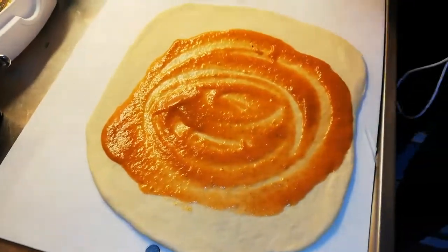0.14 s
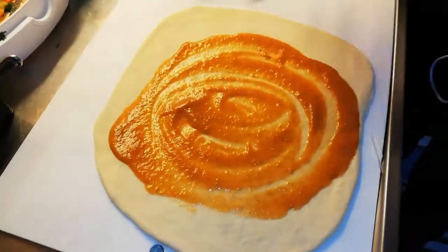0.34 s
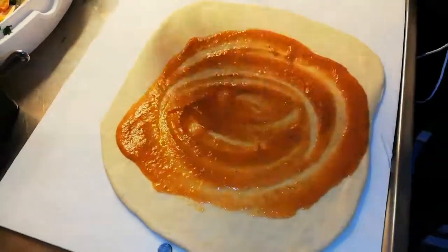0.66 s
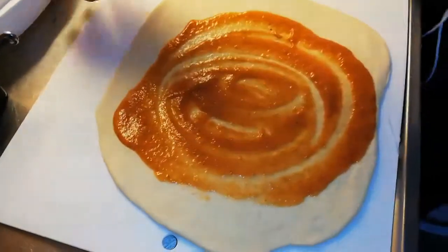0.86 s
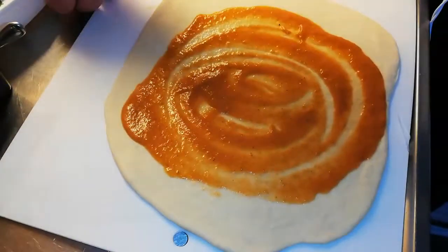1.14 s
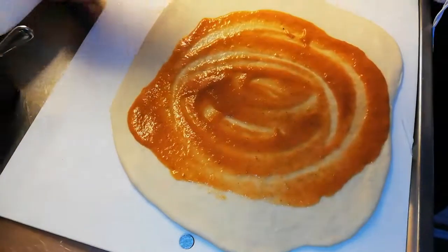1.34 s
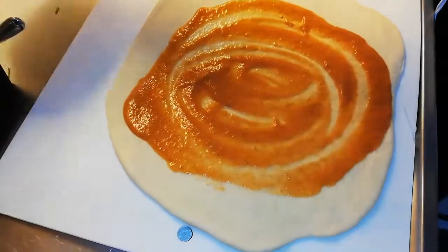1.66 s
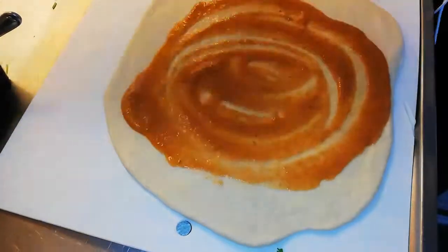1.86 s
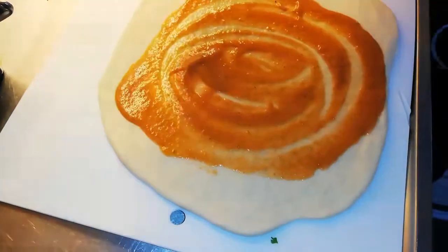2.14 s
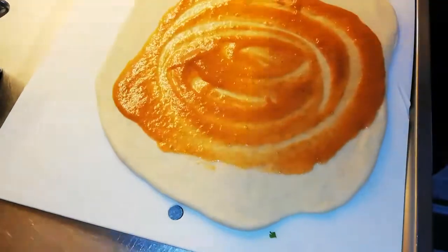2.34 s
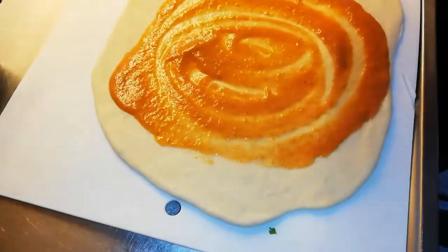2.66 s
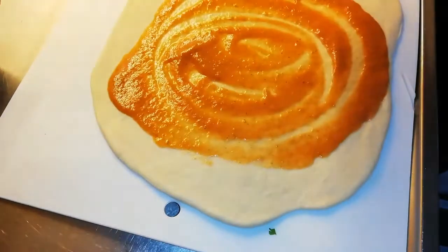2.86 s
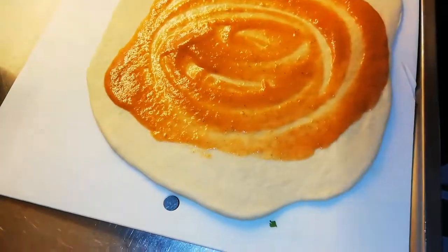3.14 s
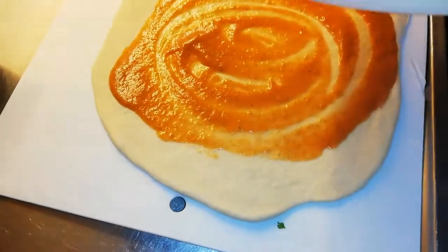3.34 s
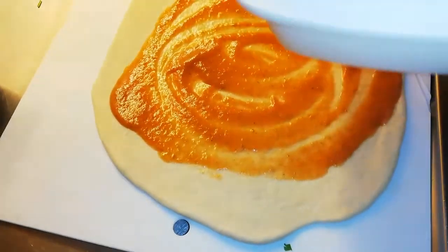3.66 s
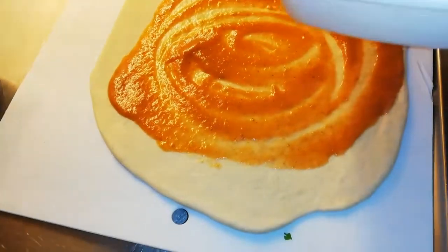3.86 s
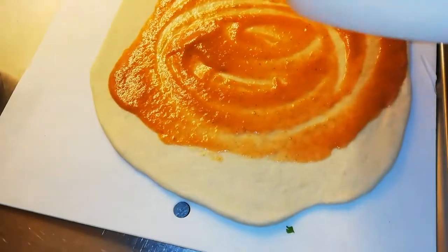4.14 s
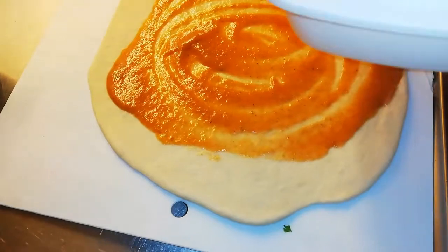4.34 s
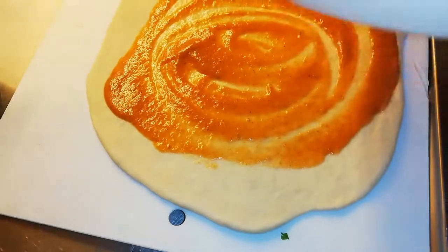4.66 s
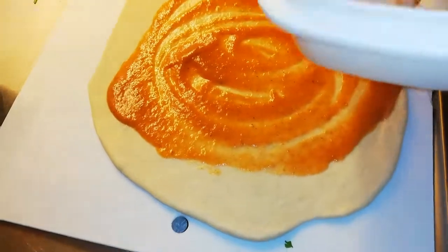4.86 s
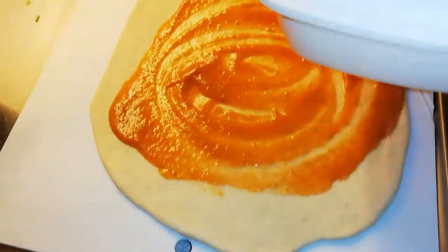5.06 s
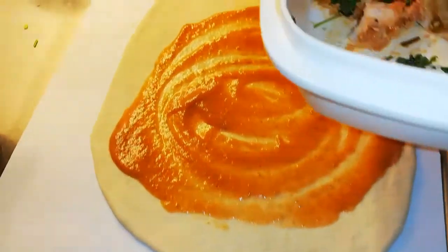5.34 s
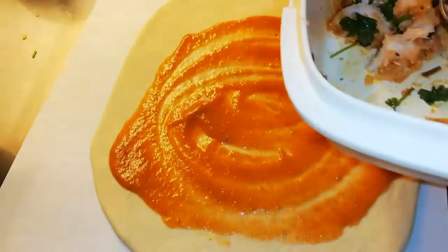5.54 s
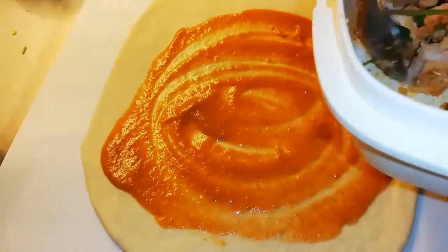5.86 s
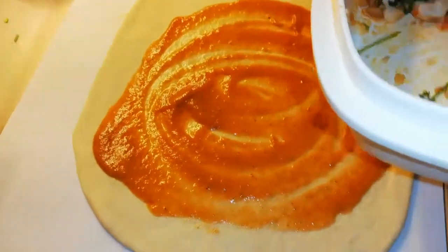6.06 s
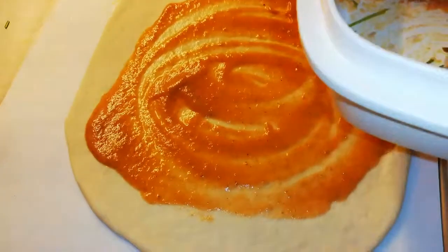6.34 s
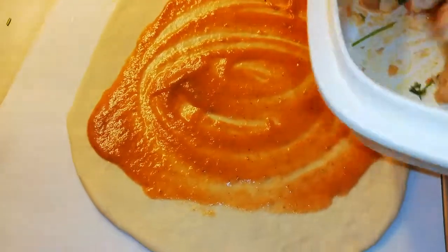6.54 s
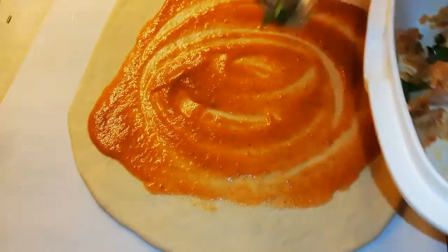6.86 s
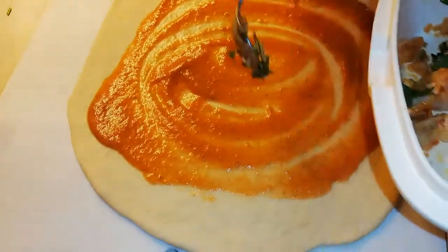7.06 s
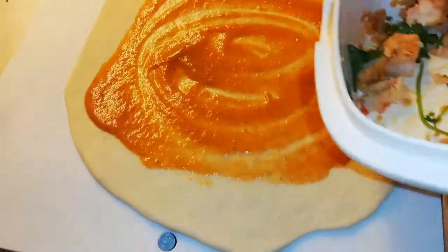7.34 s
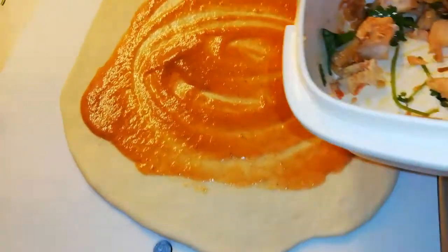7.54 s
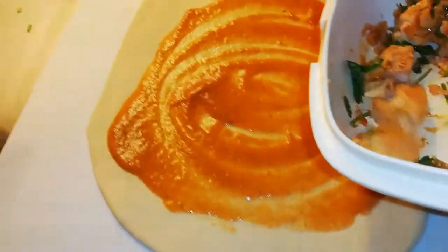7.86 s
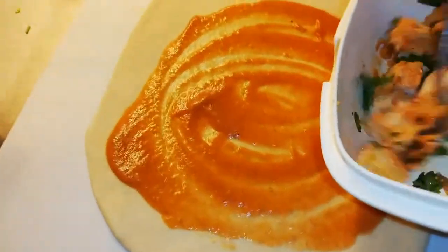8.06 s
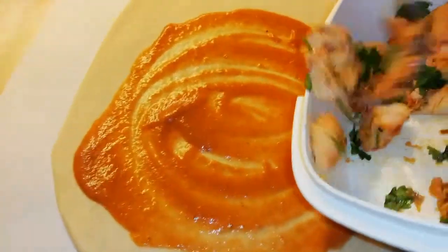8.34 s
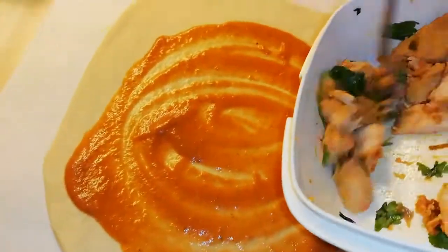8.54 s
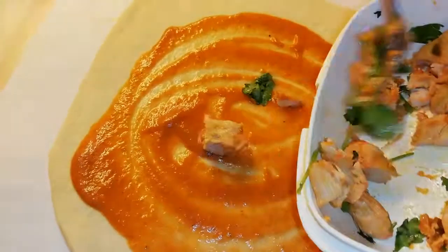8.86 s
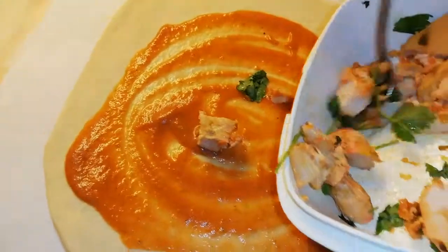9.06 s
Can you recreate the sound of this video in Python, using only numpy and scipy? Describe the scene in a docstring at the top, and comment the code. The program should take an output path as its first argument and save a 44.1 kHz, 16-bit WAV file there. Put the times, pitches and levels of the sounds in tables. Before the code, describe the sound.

A metal spoon works in a plastic food tub, heard close in a slightly echoing home kitchen. After quiet brushing and a few thumps with loose clatter, loud knocks come with quick bounces and short scrapes. Pauses follow, then clustered taps and strokes inside the hollow tub. Tiny wet snaps and faint soft landings close it, over steady appliance rumble and hiss.

```python
"""A small kitchen, close up in stereo: a spoon knocks, bounces and scrapes in a plastic food tub.
A dying clink and soft rubs come first, then dull thuds as things are set down on the counter.
Blows are sums of dying modes with bursts of contact noise; scrapes drive wall resonators with random slips.
Moist food ticks as short treble bursts and plops as soft low pushes.
An appliance rumbles over faint hiss, both made of coloured noise; sparse echoes give the room.
"""
import sys
import numpy as np
from scipy import signal
from scipy.fft import rfft, irfft, next_fast_len
from scipy.io import wavfile
from scipy.ndimage import uniform_filter1d

SR = 44100
rng = np.random.default_rng(int(sys.argv[2]) if len(sys.argv) > 2 else 0)


def digitize_waveform(pressure):
    """Quantize a signal to 16-bit integers and store it at the path in sys.argv[1].

    Rows of a 2-D input are taken as channels; values are limited to [-1, 1].
    """
    field = np.atleast_2d(pressure).T
    bounded = np.clip(field, -1, 1)
    quanta = np.round(bounded * 32767).astype(np.int16)
    wavfile.write(sys.argv[1], SR, quanta)


N = 405940
LIFTED_S = 3.5  # until then the tub stands on the counter, which muffles its hollow


def amp(db):
    """Turns decibels into a gain."""
    return 10 ** (np.asarray(db) / 20)


def evened(x):
    """Brings a signal to an rms of 1."""
    return x / np.sqrt(np.mean(x ** 2) + 1e-20)


def read(points, hz):
    """Reads a curve between its points, along log frequency."""
    f, value = np.transpose(points)
    return np.interp(np.log(hz + 1), np.log(f + 1), value)


def add(mix, s, sound):
    """Lays a stereo sound into the mix at s seconds."""
    part = mix[:, round(s * SR):][:, :sound.shape[1]]
    part += sound[:, :part.shape[1]]


def coloured(x, points):
    """Filters by a spectrum in dB."""
    hz = np.fft.rfftfreq(x.shape[-1], 1 / SR)
    return irfft(rfft(x) * amp(read(points, hz)), x.shape[-1])


def sides(pan_db):
    """Left and right gains that differ by pan_db."""
    return amp([[pan_db / 2], [-pan_db / 2]])


# how the tub's modes reach the pair: (frequency [Hz], left-right level while standing [dB],
# left-right level once lifted [dB], mean phase lead of the left [rad], its scatter [rad])
REACH = [(408, 1.5, -1.5, 2, 0.68), (750, -4, -10, 0.8, 5.4), (1080, -1.5, -4, 0.91, 0.44),
         (1730, -12, -6, -0.61, 0.56), (2330, 2, -2.5, -2.1, 0.9), (3440, 3.5, 1.5, 1.5, 0.79)]


def reach(hz, s):
    """Balance, phase lead and phase scatter between the microphones for a mode of the tub."""
    at, standing_db, lifted_db, lead, scatter = np.transpose(REACH)
    lean_db = standing_db if s < LIFTED_S else lifted_db
    return [read(np.c_[at, value], hz) for value in (lean_db, lead, scatter)]


CREST_S = .0014  # time to the crest of a blow, before the contact lengthens it


def ring(modes, seconds, near_hz=None, rise=0.0012, scatter_db=2.5, detune=0.035, s=None, far_db=0):
    """Dying modes, peak 1; their phases and, for the tub, levels differ between the microphones."""
    hz, db, t60 = np.transpose(modes)[:, :, None]
    t = np.arange(round(seconds * SR)) / SR
    u, v, w, start = rng.standard_normal((len(modes), 4)).T[:, :, None]
    swell = 1 - np.exp(-t / rise)
    lean_db = 0
    apart = np.minimum(hz / 364.0, 2.1) * w
    start = 1.2 * start
    if near_hz:  # the blow favours the modes of the wall that it strikes; they gather into one sharp crest
        octaves = np.log2(hz / near_hz)
        db = db - np.minimum(45 * octaves ** 2, far_db) - 2.5 * np.maximum(octaves - .6, 0)
        crest = CREST_S + 4 * rise  # a long contact swells more slowly and gathers less
        swell = 1 - np.exp(-(t / crest) ** 3)
        start = .3 * crest / CREST_S * start + np.pi / 2 - 2 * np.pi * hz * crest
    if s:
        lean_db, lead, scatter = reach(hz, s)
        apart = lead + scatter * w
    db = db - 10 * np.log10(1 + (hz * rise) ** 4)  # a long contact cannot drive the quick modes
    size = amp(db + scatter_db * u - 60 * t / t60) * swell
    turn = 2 * np.pi * hz * (1 + detune * v) * t + start
    out = np.array([(size * amp(side * lean_db / 2) * np.sin(turn + side * apart / 2)).sum(0)
                    for side in (1, -1)])
    return out / abs(out).max(1).mean()


def crack(t60, colour, over_s=0.011):
    """A short burst of contact noise, level 1 over its first moments, little shared by the microphones."""
    size = min(next_fast_len(round(1.3 * t60 * SR)), 4096)
    t = np.arange(size) / SR
    noise = rng.standard_normal((3, size))
    burst = coloured(noise[:2] + 0.098 * noise[2], colour) * amp(-60 * t / t60)
    burst = burst * (1 - np.exp(-t / .0006))  # a soft onset
    return burst / np.sqrt(np.mean(burst[:, t < over_s] ** 2))


# spectrum of rumble and hiss: (frequency [Hz], relative level [dB per Hz])
ROOM_TONE = [(15, -32.5), (25, 4.5), (48, -7), (76, -17), (115, -2), (205, -16), (222, -19.5), (282, -17.5),
             (441, -24), (544, -29.5), (1140, -30), (7770, -39.5), (9340, -35), (13500, -43)]
TONE_DB = -53  # rms
# how alike the two microphones hear the room: (frequency [Hz], left-right likeness [-1 to 1])
TONE_SAME = [(60, 0.99), (180, 0.97), (550, -0.22), (1650, -0.13), (4970, -0.18), (15000, 0.29)]
# swell of the treble, scaled down for the room tone and in full for faint ticks: (time [s], level [dB])
TREBLE = [(0, 9), (1.9, 0.5), (2.249, 18.5), (2.449, -2.5), (3.6, 9.5), (4.45, 3.5), (4.601, -7),
          (7.151, -9), (7.6, 7), (8.5, -2.5), (9.2, 11.5)]


def room_tone():
    """Rumble and hiss as noise spectra with drifting patches; the treble swells and sinks."""
    frames = (N // 256 + 5) // 2
    hz = np.fft.rfftfreq(2048, 1 / SR)
    a, b, c, d, patches = rng.standard_normal((frames, len(hz), 5)).T
    patches = evened(uniform_filter1d(uniform_filter1d(patches, 14, 0), 6, 1))
    treble_db = np.interp(np.arange(frames) * 512 / SR, *np.transpose(TREBLE))
    # share of the swell in each band
    lift_db = read([(1500, 0.041), (5000, 0.21), (10000, 0.23)], hz)[:, None] * treble_db
    top_db = read([(12800, 8.5), (14500, -17.5)], hz)[:, None]  # a steep drop at the top
    same = np.clip(read(TONE_SAME, hz), -1, 1)[:, None]
    left, other = a + 1j * b, c + 1j * d
    z = np.array([left, same * left + np.sqrt(1 - same ** 2) * other])
    z *= amp(read(ROOM_TONE, hz)[:, None] + 2.7 * patches + lift_db + top_db)
    return amp(TONE_DB) * evened(signal.istft(z, nperseg=2048, noverlap=1536)[1][:, :N])


# a clink already dying: (frequency [Hz], level [dB], t60 [s])
CLINK = [(2010, -49, 0.33), (2220, -41.5, 0.35), (3570, -44, 0.15)]


def dying_clink():
    """The end of an earlier clink, heard through the room, so each line is a narrow noise."""
    out = np.zeros((2, N))
    t = np.arange(SR // 3) / SR
    for hz, db, t60 in CLINK:
        fuzz = evened(uniform_filter1d(rng.standard_normal((2, len(t))), size=200))
        add(out, 0, amp(db - 60 * t / t60) * fuzz * np.sin(2 * np.pi * hz * t))
    return out


# a hand or cloth brushing a surface, three rubs: (time [s], level [dB])
RUBS = [(.39, -51), (.49, -62), (0.601, -51.5)]
# tint of the rubbing noise: (frequency [Hz], relative level [dB per Hz])
BRUSH_COLOUR = [(410, -37), (700, -8), (3030, 0.5), (5010, -8.5), (9610, -3), (12700, -10), (14000, -41)]
RUB_RISE_DB_PER_S, RUB_FALL_DB_PER_S = 126, 125


def brush():
    """Soft rubbing is coloured noise that rises and falls at each rub."""
    out = np.zeros((2, N))
    t = np.arange(SR) / SR
    level = 0
    for s, db in RUBS:
        level = level + amp(db + np.minimum(RUB_RISE_DB_PER_S * (t - s), RUB_FALL_DB_PER_S * (s - t)))
    add(out, 0, level * evened(coloured(rng.standard_normal((2, len(t))), BRUSH_COLOUR)))
    return out


# things set down on the counter: (time [s], peak level [dB], clatter over that peak level [dB])
THUDS = [(0.778, -10, -21), (0.968, -32.5, -23), (1.051, -21, -27), (1.065, -14, -10), (1.087, -12, -15.5),
         (1.105, -19.5, -30), (1.153, -32.5, -8), (1.24, -27.5, -12), (1.317, -25.5, -14.5),
         (1.364, -29, -46)]
# the counter and what stands on it: (frequency [Hz], relative level [dB], t60 [s])
COUNTER = [(51.8, -21, 0.87), (107, -20.5, 1), (137, -6.5, 0.12), (173, 4.5, 0.072), (228.5, 2.5, 0.1),
           (275.6, -3, 0.11), (360, -1.5, 0.047), (460, -12, 0.4), (520, 0.5, 0.06), (602, -5.5, 0.059)]
# spectrum of loose things clattering: (frequency [Hz], relative level [dB per Hz])
CLATTER = [(350, -26), (600, 6.5), (1400, 3), (1540, 2.5), (2280, -0.5), (10200, -15.5), (15000, -33)]


def thuds():
    """Heavy blows ring the counter, gentle ones only its low modes; loose things on it clatter."""
    out = np.zeros((2, N))
    for s, db, clatter_db in THUDS:
        contact_s = 0.0018 * amp(-0.55 * (db + 13.0))  # gentle blows touch for longer
        add(out, s, amp(db) * ring(COUNTER, 0.48, rise=contact_s, scatter_db=3.0, detune=0.00083))
        add(out, s, amp(db + clatter_db) * sides(0.28) * crack(0.19, CLATTER))
    return out


# spoon on tub: (time [s], peak level of the wall ring [dB], pitch of the struck wall [Hz],
# crack over that peak level [dB])
KNOCKS = [(1.06, -19.5, 523, -5.5), (1.311, -30, 2270, -18), (1.433, -32.5, 1980, -24),
          (2.032, -13, 720, -23.5), (2.453, -4.5, 1360, -16.5), (2.467, -14.5, 1190, -14.5),
          (2.548, -20, 1730, -37.5), (2.558, -24, 1810, -19.5), (2.586, -19.5, 2350, -16.5),
          (2.613, -11.5, 2300, -24), (2.842, -6, 1170, -17), (2.849, -11, 1020, -13), (3.11, -4, 1395, -16),
          (3.125, -10, 1900, -16), (3.328, -18.5, 940, -17), (3.333, -15.5, 2270, -25),
          (3.349, -25, 1796, -16), (3.394, -31, 1870, -31), (3.4, -32, 1940, -16.5),
          (3.829, -35.5, 1010, -38), (4.11, -30.5, 1690, -21.5), (4.175, -38.5, 1370, -36),
          (4.324, -44.5, 1830, -16), (4.641, -24.5, 1087, -54.5), (4.675, -18, 1110, -11),
          (4.745, -25.5, 1780, -12.5), (4.76, -18.5, 3530, -17), (4.767, -12, 1635, -19.5),
          (4.778, -16.5, 1760, -35), (4.786, -30, 1750, -34.5), (4.795, -30, 1280, -28),
          (4.813, -19, 1150, -30), (4.82, -21, 1100, -43), (4.842, -32, 1060, -45),
          (4.861, -24.5, 860, -33), (4.877, -22.5, 1110, -30), (4.892, -25.5, 983, -31),
          (4.905, -25.5, 1014, -29.5), (5.115, -37.5, 885, -32), (5.889, -34, 1783, -27),
          (5.936, -12.5, 1030, -14.5), (5.972, -26.5, 662, -43), (6.01, -14.5, 1290, -25),
          (6.028, -21.5, 1350, -21), (6.049, -30, 1200, -45), (6.057, -24, 980, -39),
          (6.066, -17.5, 1150, -35), (6.074, -18, 765, -18), (6.087, -21.5, 1170, -22.5),
          (6.613, -28.5, 589, -41), (6.661, -43.5, 904, -20), (6.736, -41, 1103, -38),
          (7.411, -31.5, 1786, -14.5), (7.667, -11, 1830, -21), (7.718, -23, 1700, -35),
          (7.736, -17.5, 2110, -9), (7.752, -18.5, 910, -13), (7.763, -27, 1770, -27.5),
          (7.9, -52, 3890, 7), (7.989, -7, 1760, -9), (7.998, -19.5, 1168, -31), (8.035, -27, 1760, -42.5),
          (8.048, -13, 1800, -25.5), (8.06, -30.5, 1790, 3), (8.089, -17.5, 3180, -13.5),
          (8.09, -15.5, 2580, -13), (8.123, -25.5, 2340, -33), (8.165, -24, 1040, -18.5),
          (8.599, -36.5, 620, -39), (8.603, -33.5, 1800, -10.5), (8.637, -43, 1310, -29),
          (8.923, -39, 778, -35)]
# walls of the tub: (frequency [Hz], relative level [dB])
TUB = [(620, -7.5), (760, -8.5), (900, -5.5), (1040, -2.5), (1180, -10.5), (1370, -8.5), (1560, -9),
       (1750, -1), (2020, -5), (2350, 0), (2570, -9), (2800, -11.5), (3130, 1), (3690, -6)]
WALL_T60 = .023  # s, for knocked modes up to 1500 Hz; higher ones die sooner
WALLS = [(hz, db, WALL_T60 * min(1500 / hz, 1) ** .5) for hz, db in TUB]
# air and floor of the tub: (frequency [Hz], relative level [dB], t60 [s])
HOLLOW = [(284.3, 1, 0.08), (411, 10.5, 0.037), (513, 11, 0.019)]
# tub and counter ringing together while it stands: (frequency [Hz], relative level [dB], t60 [s])
STANDING = [(757, -3, 0.12), (828, -9.5, 0.54), (968, -0.5, 0.35), (1044, -4, 0.2)]
STANDING_RING_DB = -20.5  # over the walls, before the rattle
# contact noise of spoon on plastic: (frequency [Hz], relative level [dB per Hz])
CRACK = [(880, -19.5), (1500, -10), (3310, -9.5), (5580, -12.5), (6690, -13.5), (8510, -11.5), (10400, -11),
         (14100, -32.5), (16500, -52)]
# boom over the walls, for a 0 dB blow at 1200 Hz, and its change while standing or on a bounce
BOOM_DB, STANDING_DB, BOUNCE_DB = -3.5, -18.5, -19
BOOM_PER_DB, BOOM_DB_PER_OCTAVE = 0.35, -12.5  # strong blows, and low ones near the floor, boom more
BOUNCE_S, LEAD_DB = .12, 6  # a blow this soon after one as strong, or weaker by less than this, is a bounce


def knocks():
    """Each blow rings the walls, cracks at the contact and booms in the hollow."""
    out = np.zeros((2, N))
    times, levels = np.transpose(KNOCKS)[:2]
    for s, db, hz, crack_db in KNOCKS:
        standing = s < LIFTED_S
        bounce = any((times < s) & (times > s - BOUNCE_S) & (levels > db - LEAD_DB))
        boom_db = BOOM_DB + BOOM_PER_DB * db + BOOM_DB_PER_OCTAVE * np.log2(hz / 1200)
        boom_db += STANDING_DB * standing + BOUNCE_DB * bounce
        contact_s = 0.000085 * amp(-.4 * (crack_db + 9.5))  # soft blows, with little crack, touch for longer
        far_db = 7.5 - 0.41 * (crack_db + 19.0)  # and leave the far modes weaker, by up to this much
        wall = ring(WALLS, 0.069, hz, rise=contact_s, s=s, far_db=far_db)
        add(out, s - 3 * contact_s, amp(db) * wall)
        if standing:
            buzz = ring(STANDING, .3, detune=0.02, s=s)
            loose = evened(uniform_filter1d(rng.standard_normal(buzz.shape[1]), size=300))
            rattle = 0.54 + 0.84 * loose  # it rattles on the counter
            add(out, s, amp(db + STANDING_RING_DB) * buzz * rattle)
        add(out, s + CREST_S / 2, amp(db + crack_db) * crack(.018, CRACK))
        add(out, s, amp(db + boom_db) * ring(HOLLOW, 0.04, s=s))
    return out


def scrape(s, rise_s, fall_s, top_db, top_grit_db, first_hz, last_hz):
    """Uneven slips of the spoon drive the wall modes under it, with a grit of fine noise."""
    t = np.arange(-rise_s, fall_s, 1 / SR)
    eased_db = STROKE_ENDS_DB * np.maximum(-t / rise_s, t / fall_s) ** STROKE_BEND
    grit_db = top_grit_db + GRIT_PER_DB * eased_db
    near_hz = np.linspace(first_hz, last_hz, len(t))
    slips = amp(3.5 * np.minimum(rng.exponential(1, len(t)), 3))
    slips = slips * (rng.random(len(t)) < 1500 / SR)  # about 1500 slips a second
    # the stroke stutters
    slips *= amp(3.5 * evened(uniform_filter1d(rng.standard_normal(len(t)), size=250)))
    drive = slips * rng.standard_normal((3, len(t)))
    wall = 0
    for hz, mode_db, t60 in WALLS:
        hz = hz * rng.normal(1, .025)  # each stroke detunes every mode a little at random
        r = amp(-60 / (1.4 * t60 * SR))  # wall modes ring 1.4 times longer in scrapes, for a clearer pitch
        lean_db, _, scatter = reach(hz, s)
        push = scatter * drive[:2] + 0.92 * drive[2]  # a part for each microphone and a shared part
        mode = signal.lfilter([1, 0, -1], [1, -2 * r * np.cos(2 * np.pi * hz / SR), r * r], push)
        under_db = mode_db - np.minimum(50 * np.log2(hz / near_hz) ** 2, 15)  # favours modes under the spoon
        wall = wall + evened(mode) * sides(lean_db) * amp(under_db)
    rough = 1 + 0.3 * uniform_filter1d(slips, size=40) / slips.mean()
    grit = coloured(rough * rng.standard_normal((2, len(t))), CRACK)
    both = evened(wall) + amp(grit_db) * evened(grit)
    return s - rise_s, amp(top_db + eased_db) * both * signal.windows.tukey(len(t), .15)


# strokes along the wall: (time of most pressure [s], rise [s], fall [s], level at most pressure [dB],
# grit over ring there [dB], first pitch of the wall [Hz], last pitch of the wall [Hz])
STROKES = [(2.529, 0.062, 0.077, -41, 0.5, 1314, 1918), (2.617, 0.093, 0.036, -22.5, -12.5, 1750, 2500),
           (3.14, 0.011, 0.1, -43.5, -5, 1096, 790), (3.251, .09, 0.03, -35.5, -9, 1600, 1900),
           (3.36, 0.14, 0.11, -49, 5.5, 1800, 1850), (4.688, 0.0081, 0.086, -49.5, 5, 897, 1490),
           (4.785, 0.081, 0.097, -30.5, -7, 1860, 1100), (5.02, 0.22, 0.041, -58, 1, 1000, 1200),
           (6.06, 0.15, 0.047, -42.5, -2, 1296, 1177), (7.747, 0.062, .05, -26, -5.5, 1700, 1500),
           (8.089, 0.053, 0.03, -30, -3.5, 2050, 2580), (8.23, 0.14, 0.066, -64.5, 17, 1586, 1222),
           (8.602, 0.019, 0.046, -48, 9, 1900, 1917)]
STROKE_ENDS_DB, STROKE_BEND = -38.5, 1  # level at both ends of a stroke under its top; 1 is a straight slope
GRIT_PER_DB = -0.57  # the grit fades less than the ring as pressure eases


def scrapes():
    """Lays out the strokes of the spoon, each with its own pressure and path along the wall."""
    out = np.zeros((2, N))
    for row in STROKES:
        add(out, *scrape(*row))
    return out


# moist food parting: (time [s], level [dB])
TICKS = [(3.614, -50), (4.103, -46.5), (4.352, -53), (4.923, -43.5), (5.015, -44), (5.036, -43.5),
         (5.2286, -50), (5.366, -48), (5.448, -53), (8.5758, -35), (8.6447, -44), (8.8962, -27.5),
         (8.924, -43.5), (9.0324, -44)]
# spectrum of a snap: (frequency [Hz], relative level [dB])
SNAP = [(4000, -28), (7000, -12.5), (10000, 3.5), (12500, -10), (15500, -32.5)]
# fainter ticks fall by chance once the tub is lifted, louder while the treble is up
FAINT_PER_S, FAINT_DB, FAINT_SPREAD_DB = 14, -67., 2.5  # rate, least level before the treble, mean excess


def ticks():
    """Tiny bright snaps, each a short burst of treble noise."""
    out = np.zeros((2, N))
    lifted_for_s = N / SR - LIFTED_S
    when, size = rng.random((round(FAINT_PER_S * lifted_for_s), 2)).T
    when = LIFTED_S + when * lifted_for_s
    faint_db = FAINT_DB - FAINT_SPREAD_DB * np.log(1 - size) + np.interp(when, *np.transpose(TREBLE))
    for s, db in list(TICKS) + list(zip(when, faint_db)):
        add(out, s, amp(db) * sides(rng.normal(0, 3.)) * crack(.013, SNAP, over_s=.001))
    return out


# morsels of food landing: (time [s], peak level [dB], pitch [Hz])
PLOPS = [(8.587, -44.5, 400), (8.898, -42, 130), (9.058, -34.5, 454)]


def plops():
    """Each morsel lands with one soft push and hardly rings."""
    out = np.zeros((2, N))
    for s, db, hz in PLOPS:
        u = np.arange(0, 4 / hz, 1 / SR) * hz * 2 * np.pi
        push = np.sin(u) * u / 2.46 * np.exp(1 - u / 2.3)
        add(out, s, amp(db) * push * np.ones((2, 1)))
    return out


# how long the room rings: (frequency [Hz], t60 [s])
KITCHEN = [(200, 0.6), (600, 0.37), (1400, 0.32), (3700, 0.33), (9700, 0.28)]


def kitchen(x):
    """Sparse taps of random sign, each band dying at its own speed, other taps for each microphone."""
    size = SR // 2
    taps = np.zeros((2, size))
    at = np.arange(120, size - 20, 20)
    at = at + rng.integers(0, 20, (2, len(at)))
    np.put_along_axis(taps, at, rng.choice([-1., 1.], at.shape), 1)
    hz, t, z = signal.stft(taps, SR, nperseg=256)
    tail = signal.istft(z * amp(-60 * t / read(KITCHEN, hz)[:, None]), SR, nperseg=256)[1]
    return signal.oaconvolve(x, tail / np.linalg.norm(tail[0]), axes=1)[:, :N]


def scene():
    """Mixes tub, counter and food with their echoes, the rubs, the clink and the room tone."""
    tub = knocks() + ticks() + scrapes()
    # a small tub radiates no bass
    tub = signal.sosfilt(signal.butter(2, 330., "high", fs=SR, output="sos"), tub)
    near = tub + thuds() + plops()
    # two sets of echoes fade in and out in turn, so the tail keeps no fixed lines
    turn = 2 * np.pi * 1.7 * np.arange(N) / SR
    wet = kitchen(near * np.sin(turn)) + kitchen(near * np.cos(turn))
    # long waves reach both microphones alike
    side = coloured((wet[0] - wet[1]) / 2, [(60, -23.0), (150, -17.5), (400, 0.0)])
    wet = wet.mean(0) + np.array([side, -side])
    return near + amp(-8.5) * wet + brush() + dying_clink() + room_tone()


EDGE_HZ = 16600  # upper band limit


def record(dry):
    """The microphones lose the deepest bass, the loudest peaks are rounded; then the band limit."""
    dry = signal.sosfilt(signal.butter(2, 32., "high", fs=SR, output="sos"), dry)
    dry = 1.3 * np.tanh(dry / 1.3)
    band = signal.firwin(511, EDGE_HZ, window=("kaiser", 12), fs=SR)
    return signal.oaconvolve(dry, band[None], "same")


dry = scene()
out = record(dry)
digitize_waveform(out)
```